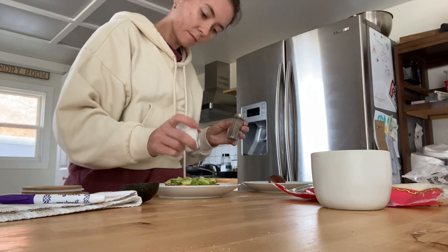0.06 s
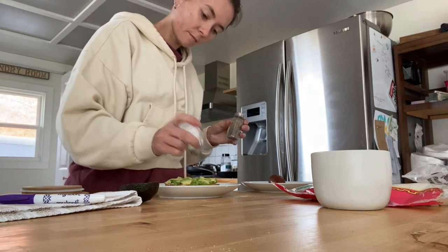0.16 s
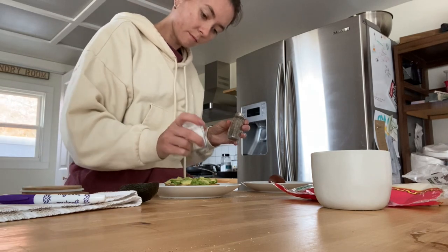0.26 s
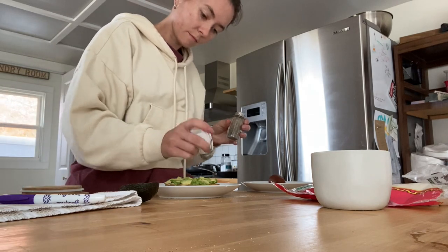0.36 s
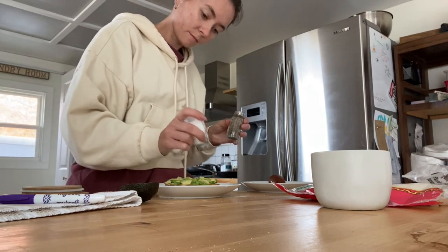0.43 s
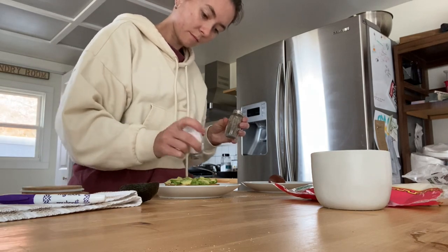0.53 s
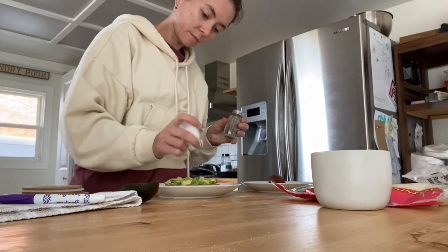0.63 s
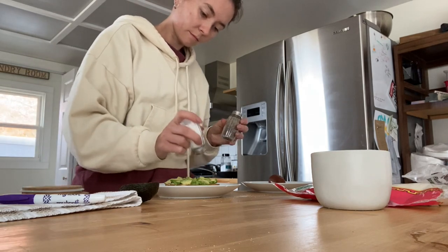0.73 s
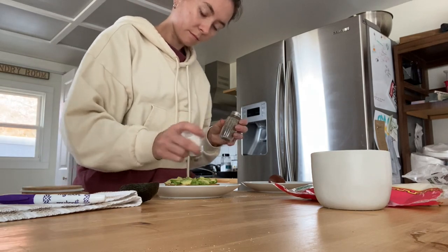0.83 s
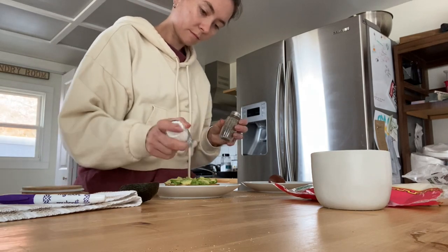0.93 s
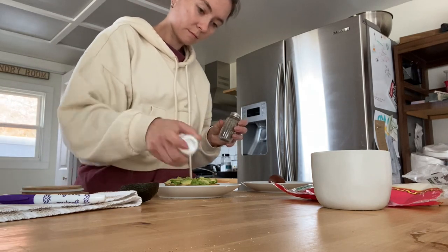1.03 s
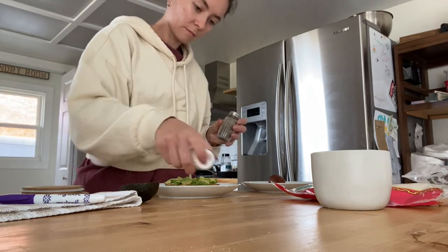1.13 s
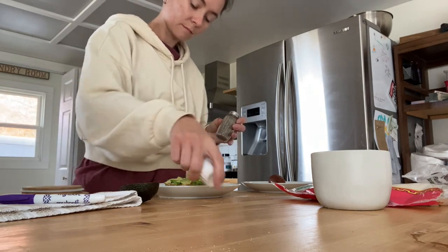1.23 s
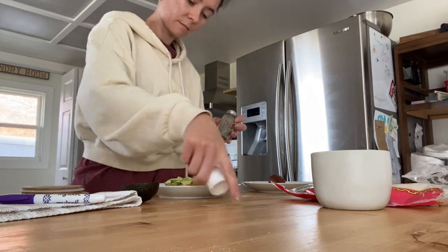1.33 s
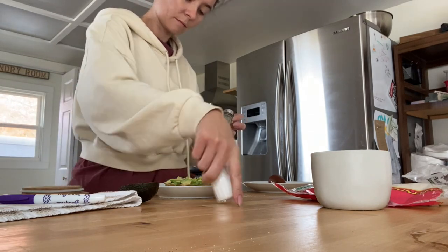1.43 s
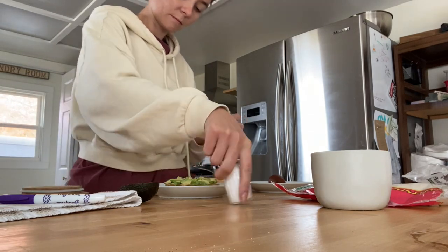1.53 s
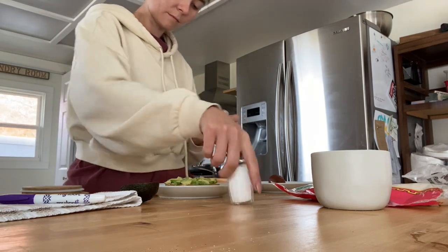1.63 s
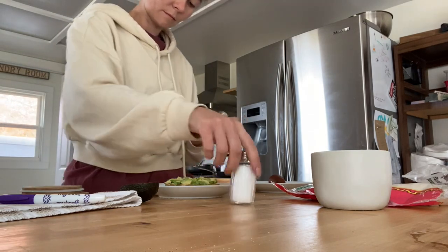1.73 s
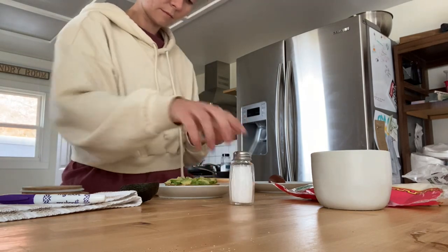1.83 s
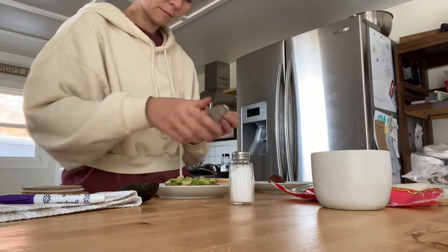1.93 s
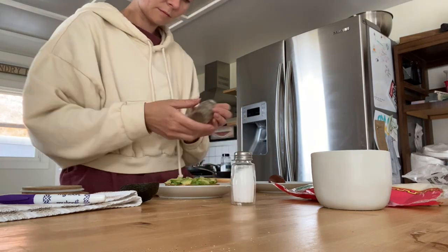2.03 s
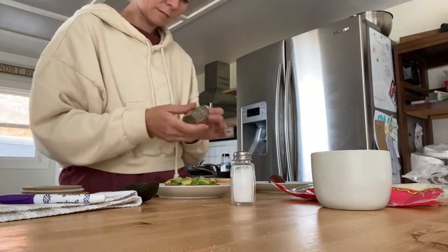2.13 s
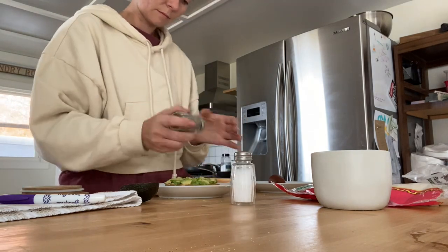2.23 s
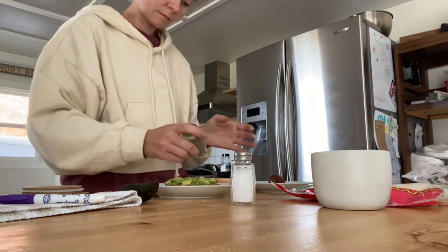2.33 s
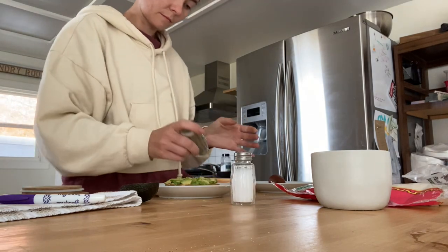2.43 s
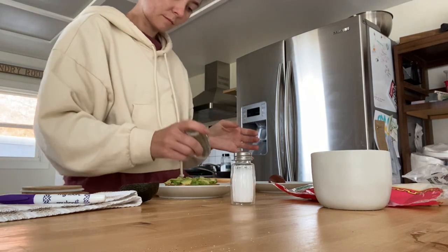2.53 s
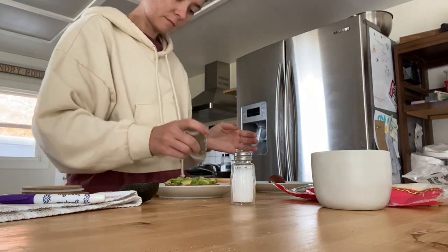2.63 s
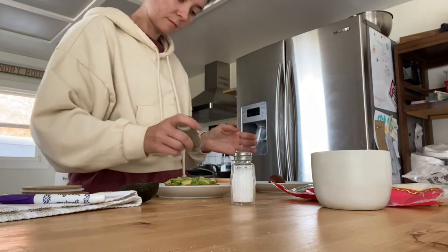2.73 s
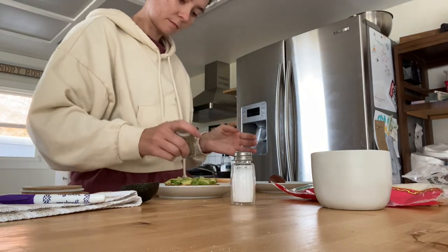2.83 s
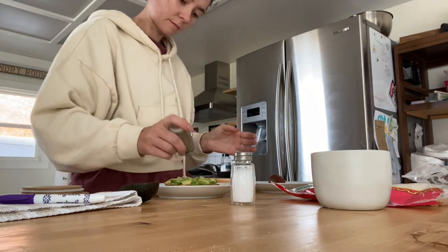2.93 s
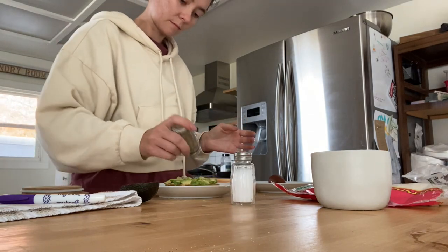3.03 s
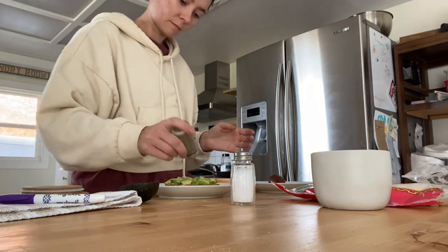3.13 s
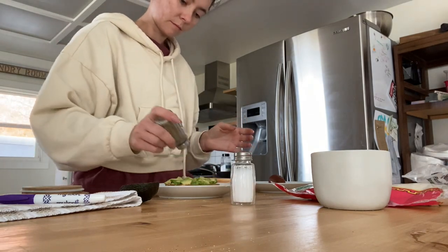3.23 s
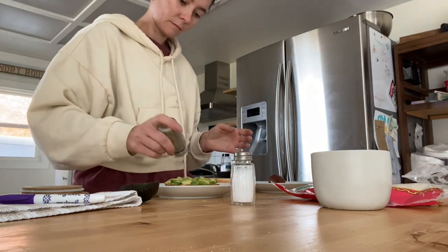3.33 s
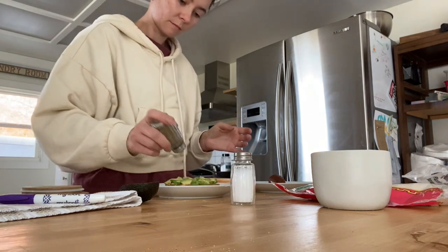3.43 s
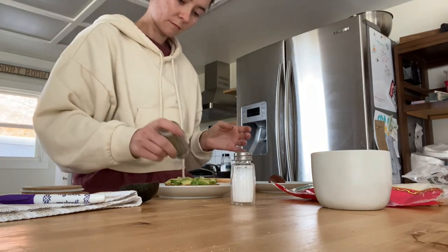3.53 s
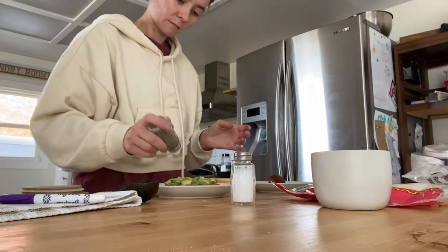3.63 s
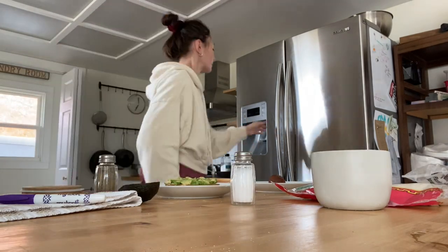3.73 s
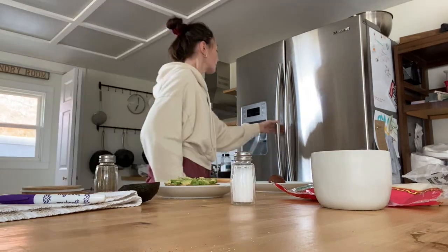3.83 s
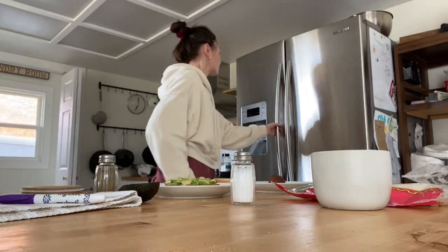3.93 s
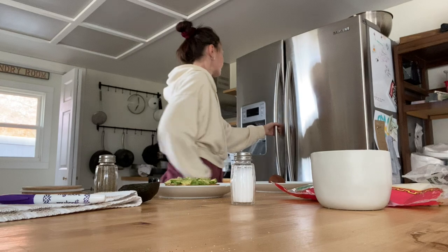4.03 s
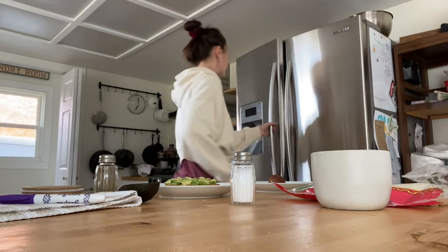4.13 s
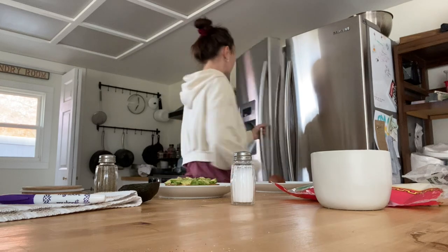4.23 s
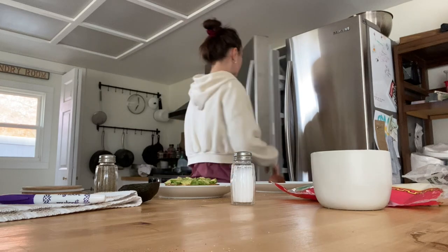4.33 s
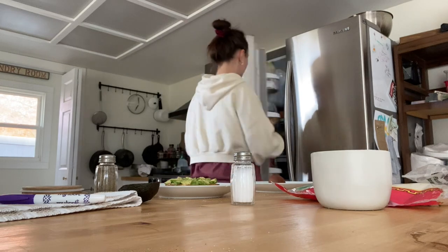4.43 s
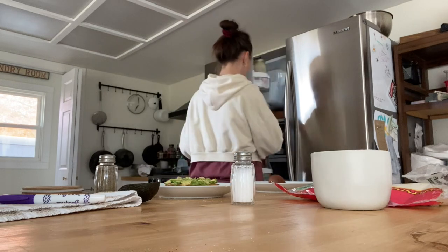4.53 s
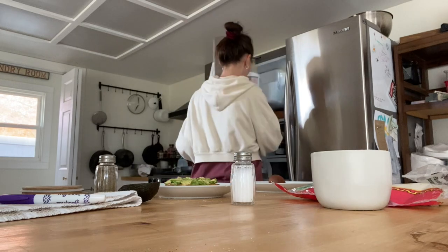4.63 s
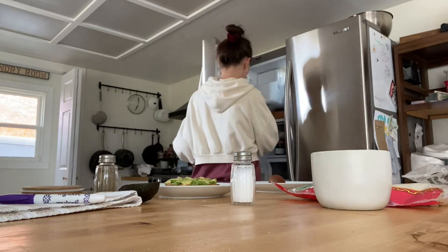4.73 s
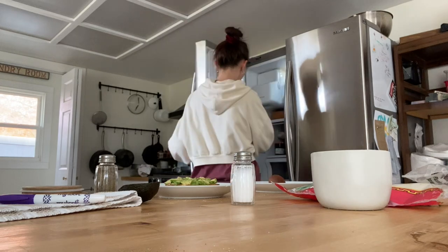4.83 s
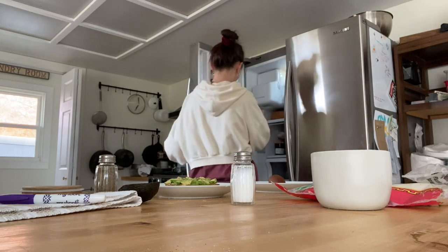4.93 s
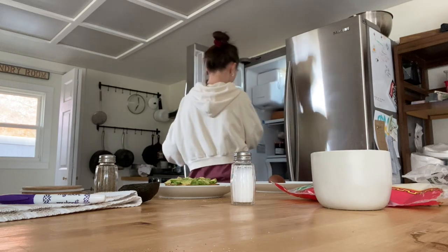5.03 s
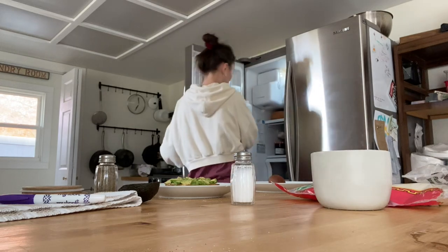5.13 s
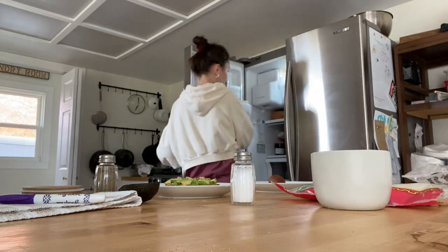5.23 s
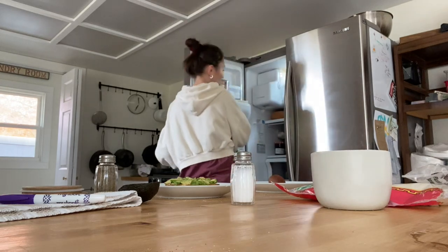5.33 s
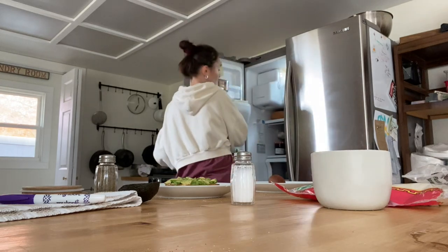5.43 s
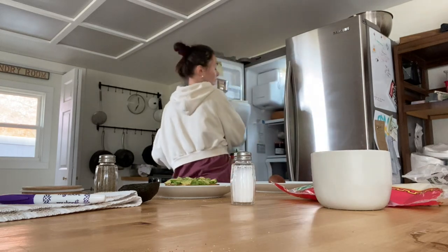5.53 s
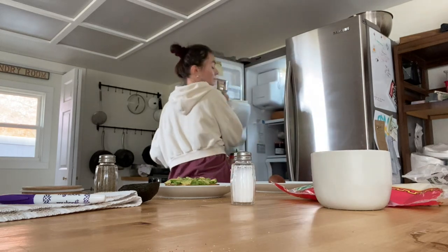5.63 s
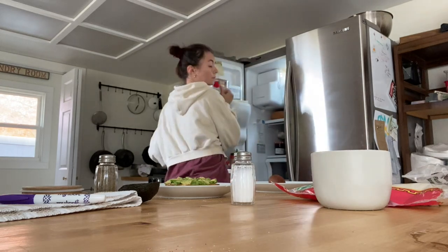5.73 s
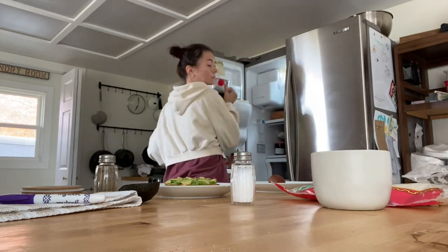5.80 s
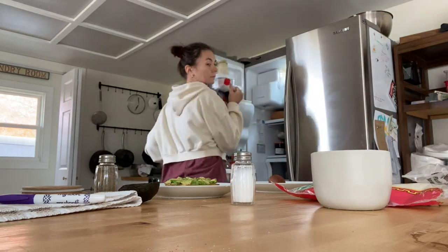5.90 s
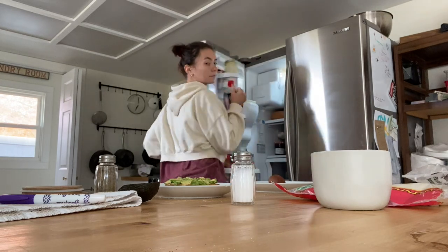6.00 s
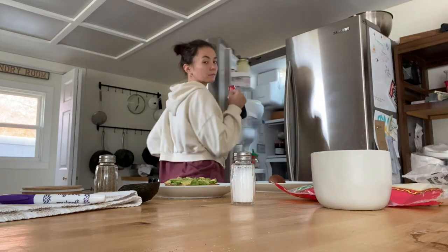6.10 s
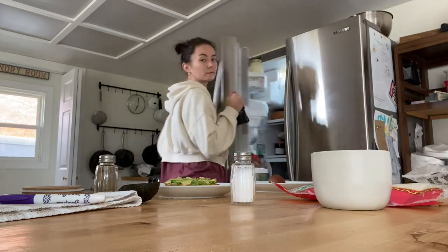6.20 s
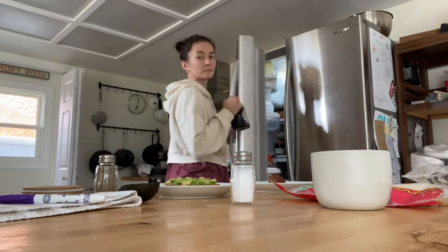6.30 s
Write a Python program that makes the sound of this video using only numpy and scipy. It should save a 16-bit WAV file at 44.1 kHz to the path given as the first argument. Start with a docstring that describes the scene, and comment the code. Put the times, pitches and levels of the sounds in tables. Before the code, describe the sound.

Low motor hum fills a small live kitchen. A soft gritty shake and tiny metal cap ticks lead to a glass foot landing on a wooden table, close by, then juddering across the grain with hollow knocks and rumble. Farther off and more reverberant, a fridge door comes loose with plastic clacks, dull thuds and a soft boom; contents knock and clink, strongest near the end, then quiet hum returns.

```python
"""A quiet kitchen: the fridge motor drones and low filtered noise hums throughout. A glass salt shaker hisses
with gritty noise and its cap ticks; it lands on a wooden table, then drags in short judders: noise bursts ring
board modes, under scrape and rumble. Across the room a fridge door is pulled open: bins and panels knock, jars
clink, air rushes and the door shudders and booms. A decaying noise tail answers each knock."""
import sys
import numpy as np
from scipy import signal
from scipy.fft import rfft, irfft, next_fast_len
from scipy.io import wavfile
from scipy.ndimage import map_coordinates

SR = 44100
rng = np.random.default_rng(int(sys.argv[2]) if len(sys.argv) > 2 else 0)


def to_wav(s):
    """Save 16-bit WAV."""
    ch = np.atleast_2d(s).T  # columns
    pcm = np.round(np.clip(ch, -1, 1) * 32767)  # PCM
    wavfile.write(sys.argv[1], SR, pcm.astype(np.int16))


N = 280476

# dragged foot catching on the grain:
# [t/s, click/dB, knock/dB, board thump/dB, knock f/Hz, thump f/Hz]
FOOT_CATCHES = [(1.632, -81.5, -41.5, -25.5, 500, 228.8), (1.641, -74, -35.5, -29, 700, 215.5),
                (1.652, -78.5, -51, -27, 550, 219.1), (1.7033, -67.5, -45, -25.5, 504, 237.8),
                (1.7298, -64.5, -35, -24, 712, 237.1), (1.7466, -52.5, -26, -22, 882, 231.6),
                (1.764, -72.5, -43.5, -31, 599, 197), (1.7825, -76, -53.5, -28, 460, 250.8),
                (1.8173, -45, -27.5, -25.5, 820, 292.5), (1.832, -65, -32, -24.5, 600, 229.3),
                (1.876, -59, -39, -24, 595, 229), (1.9022, -63, -37, -31.5, 510, 219.9),
                (1.94, -52, -32, -37, 787, 286), (1.949, -57, -37, -19.5, 580, 223.7),
                (1.979, -62, -48.5, -37, 552, 286), (2.0094, -53, -26, -22.5, 790, 258.7),
                (2.032, -68.5, -44.5, -29.5, 594, 240), (2.048, -68.5, -34.5, -22, 690, 266.8),
                (2.0641, -55.5, -33.5, -24.5, 1100, 250), (2.079, -68, -37.5, -23.5, 660, 214),
                (2.1019, -65.5, -43, -36.5, 1180, 250), (2.1111, -65.5, -32.5, -22.5, 664, 248.8),
                (2.126, -67.5, -38.5, -22, 605, 251.1), (2.138, -65, -44, -27.5, 504, 217.4),
                (2.1744, -63, -29.5, -25.5, 591, 248.6), (2.185, -66, -30.5, -21, 610, 259.9),
                (2.2117, -68, -40, -32, 1100, 253.4), (2.2195, -68.5, -43.5, -26.5, 500, 250),
                (2.244, -56.5, -37, -25.5, 1115, 219.5), (2.2665, -70.5, -32, -25, 640, 272.7),
                (2.276, -69, -32.5, -29, 1100, 274), (2.2892, -55, -33.5, -26, 1240, 299),
                (2.3024, -73, -28.5, -22.5, 633, 253)]
# fridge contacts: [t/s, crack/dB, knock/dB, panel thud/dB, knock f/Hz, thud f/Hz]
FRIDGE_CONTACTS = [(3.4966, -72.5, -53, -56.5, 976, 197.4), (3.519, -76.5, -51.5, -73, 665, 167),
                   (3.7664, -65.5, -74.5, -67.5, 710, 121.5), (3.7885, -46.5, -34.5, -41.5, 744, 488),
                   (3.8014, -46.5, -37, -33, 730, 311), (3.868, -53, -42, -36, 900, 294),
                   (3.8817, -43.5, -31.5, -29, 1280, 497), (3.8936, -47.5, -19, -27, 620, 226),
                   (3.92, -41.5, -34, -24, 690, 381), (3.9466, -50.5, -24.5, -21.5, 576, 326),
                   (3.956, -49.5, -27, -20, 773, 266.4), (3.978, -58.5, -45.5, -43.5, 930, 261),
                   (3.9975, -42.5, -48, -28.5, 640, 153.2), (4.016, -67, -39, -37.5, 1000, 221),
                   (4.036, -66, -38.5, -60, 796, 155), (4.048, -31.5, -23, -22, 784, 294.7),
                   (4.0565, -23, -19, -31, 1830, 530), (4.058, -41.5, -27, -43, 965, 403),
                   (4.068, -40.5, -31, -21.5, 724, 257.6), (4.0835, -50, -27, -20, 973, 250),
                   (4.1, -37, -26, -55, 1030, 250), (4.2467, -58, -37, -30.5, 703, 240.7),
                   (4.268, -78, -55, -33.5, 600, 162.3), (4.4945, -37, -37.5, -30, 615, 507.4),
                   (4.5434, -39.5, -46, -35.5, 700, 531), (4.7737, -54, -49, -58, 890, 202),
                   (4.9444, -55, -49.5, -44.5, 610, 466), (5.0094, -40.5, -40.5, -40, 920, 490),
                   (5.034, -33, -30, -33.5, 880, 482.4), (5.0405, -32.5, -23.5, -31, 907, 441.4),
                   (5.042, -46, -28, -45.5, 1174, 456), (5.0805, -46, -46, -31.5, 1020, 454),
                   (5.098, -25, -40, -29.5, 930, 307), (5.116, -51.5, -41.5, -36.5, 900, 320),
                   (5.138, -48, -54.5, -37.5, 910, 355), (5.1845, -41.5, -22, -28, 1060, 439.6),
                   (5.187, -60, -42, -23, 1700, 265.2), (5.1885, -52.5, -33.5, -20, 730, 429.8),
                   (5.2052, -42, -30.5, -21, 1940, 440), (5.214, -61.5, -39, -21, 735, 419),
                   (5.244, -70.5, -45.5, -30.5, 700, 250), (5.2727, -65.5, -54, -31, 700, 210),
                   (5.3651, -49.5, -39.5, -59, 1080, 423), (5.387, -28, -26, -30, 1066, 291),
                   (5.394, -41.5, -26, -33.5, 1070, 399), (5.409, -47.5, -31, -24, 618, 287.6),
                   (5.4287, -17.5, -17.5, -23.5, 914, 312), (5.4445, -35.5, -27, -20.5, 1110, 425),
                   (5.458, -41, -26.5, -17, 1040, 358), (5.477, -34, -18.5, -20.5, 1280, 316.2),
                   (5.4952, -33, -17, -18, 990, 296), (5.504, -40.5, -24.5, -15.5, 673, 360.4),
                   (5.519, -41.5, -33, -15.5, 700, 351.1), (5.535, -44, -31, -29, 905, 336),
                   (5.561, -40.5, -27, -32, 870, 302), (5.582, -49, -55, -27.5, 710, 345),
                   (5.6275, -27.5, -25, -39.5, 636, 232), (5.641, -64.5, -29.5, -24.5, 660, 299.8),
                   (5.659, -58, -33.5, -24, 620, 312), (5.691, -38.5, -28, -30.5, 1140, 351),
                   (5.68, -61, -44, -29, 700, 327.4), (5.717, -51, -44, -24, 605, 357),
                   (6.2997, -61.5, -65, -65, 594, 284)]


def amp(db):
    """Decibels to gain."""
    return 10 ** (np.asarray(db) / 20)


def unit(x):
    """Scale to rms 1."""
    return x / np.sqrt(np.mean(x ** 2) + 1e-20)


def noise(channels=None):
    """White Gaussian noise over the whole scene."""
    return rng.standard_normal(N if channels is None else (channels, N))


def along(points, hz):
    """Interpolate (f/Hz, value) points on a log frequency axis."""
    f, v = np.transpose(points)
    return np.interp(np.log(hz + 1), np.log(f + 1), v)


def level(rows):
    """Gain per sample from (t/s, level/dB) rows, -140 dB outside them."""
    t_s, db = np.transpose(rows)
    return amp(np.interp(np.arange(N) / SR, t_s, db, left=-140, right=-140))


def swells(rows, rise_db_per_s, fall_db_per_s):
    """Gain per sample: each (t/s, level/dB) peak climbs and sinks at a constant dB rate."""
    t = np.arange(N) / SR
    gain = 0
    for peak_s, db in rows:
        drop_db = np.where(t < peak_s, rise_db_per_s * (peak_s - t), fall_db_per_s * (t - peak_s))
        gain = gain + amp(db - drop_db)
    return gain


def wobble(knots_per_s):
    """Smooth random curve through Gaussian knots."""
    knots = rng.standard_normal(int(N * knots_per_s / SR) + 4)
    return map_coordinates(knots, [np.arange(N) * knots_per_s / SR])


def filtered(x, response):
    """Apply a complex frequency response by zero-padded FFT."""
    n = x.shape[-1]
    m = next_fast_len(n + SR // 4)
    return irfft(rfft(x, m) * response(np.fft.rfftfreq(m, 1 / SR)), m)[..., :n]


def shade(points):
    """Smooth zero-phase response through (f/Hz, gain/dB) points."""
    return lambda hz: amp(along(points, hz))


def modes(peaks):
    """Causal sum of (f/Hz, width/Hz, gain/dB) resonances with alternating sign."""
    def response(f):
        total = 0
        for k, (centre, width, db) in enumerate(peaks):
            band = 1j * f * width
            total = total + (-1) ** k * amp(db) * band / (centre ** 2 - f * f + band)
        return total
    return response


def near(centre_hz, width_ratio):
    """Broad resonance favouring modes about the pitch of the struck spot."""
    return lambda f: 1j * f * centre_hz / (centre_hz ** 2 - f * f + 1j * f * centre_hz * width_ratio)


def narrow(hz, width_hz):
    """One resonance applied twice."""
    return lambda f: modes([(hz, width_hz, 0)])(f) ** 2


def gritty(spectrum, grit_db):
    """Shaped noise at rms 1 with a fast random flicker, like dense small grains."""
    return unit(filtered(noise(2) * amp(grit_db * wobble(260)), shade(spectrum)))


def narrow_hum(rows, hz, width_hz):
    """Noise with a given level course through a narrow resonance, gain-compensated for its width."""
    return filtered(level(rows) * noise(), narrow(hz, width_hz)) * np.sqrt(2 * SR / np.pi / width_hz)


def hum():
    """Room at rest: drifting low noise, wavering fridge-motor tones and microphone self-noise."""
    # centre spectrum: [f/Hz, density/dB]
    centre_shape = [(12, -54.5), (20, -26.5), (31, -8), (42, -1.5), (60, -3), (84, -7), (107, -19.5),
                    (199, -17), (295, -15.5), (370, -27.5), (500, -24), (582, -29.5), (848, -34),
                    (1800, -54.5), (2340, -85.5), (3960, -120)]
    # side spectrum: [f/Hz, density/dB]
    side_shape = [(20, -12), (40, 1), (65, 11.5), (110, -14), (210, 3), (300, -5), (500, -9.5), (600, -15),
                  (870, -22.5), (1800, -35.5), (4000, -41), (8000, -45.5), (15000, -40.5)]
    # fridge-motor tones: [f/Hz, resonance width per pass/Hz, level/dB]
    motor_tones = [(48.21, 6, -62.5), (210, 9.1, -65.5), (250, 9.8, -69), (296, 10, -72), (497, 7.6, -77)]
    # microphone self-noise: [f/Hz, density/dB]
    fizz_shape = [(800, -13), (1800, -2), (3800, -2), (4300, -9), (8000, -8), (13500, -7.5)]
    centre = unit(filtered(noise(), shade(centre_shape)))
    sides = amp(-2.5) * unit(filtered(noise(), shade(side_shape)))
    drift = amp(-53.5 + 1.9 * wobble(5.5))
    drone = sum(amp(db) * unit(filtered(noise(), narrow(hz, width_hz))) for hz, width_hz, db in motor_tones)
    fizz = amp(-81.5) * unit(filtered(noise(), shade(fizz_shape)))
    return drift * np.array([centre, sides]) + [fizz + drone, 0.33 * drone]


def salt():
    """Salt rushing in the glass: gritty noise swelling at each shake."""
    # shakes: [t/s, level/dB]
    shakes = [(0.96, -64.5), (1.15, -62.5)]
    # grain spectrum: [f/Hz, density/dB]
    grain = [(600, 1), (1500, -4.5), (3000, -5.5), (6000, -17.5), (12000, -31.5)]
    return swells(shakes, rise_db_per_s=342.5, fall_db_per_s=126.5) * gritty(grain, grit_db=2.0)


def cap():
    """Metal cap ticks: 3 ms t60 noise bursts, each about its own pitch."""
    # ticks: [t/s, peak level/dB, f/Hz]
    ticks = [(0.9921, -62, 2400), (1.165, -50, 2300), (1.285, -63.5, 2890), (1.884, -56, 3800),
             (1.8924, -49, 6500), (1.9675, -57.5, 5500), (2.039, -57, 7300), (2.134, -58, 6000),
             (2.4832, -63, 2400), (2.6613, -62, 5630)]
    out, t = np.zeros((2, N)), np.arange(400) / SR
    for onset_s, db, hz in ticks:
        burst = amp(-60 * t / 0.003) * rng.standard_normal((2, len(t)))
        tick = filtered(burst, lambda f: near(hz, .6)(f) ** 2)
        out[:, round(onset_s * SR):][:, :len(t)] += amp(db) * tick / np.abs(tick).max()
    return out


def room(dry):
    """Convolve each contact with its own centre and side tails: noise dying by frequency."""
    # reverberation time: [f/Hz, t60/s]
    decay = [(100, 0.36), (500, 0.424), (2000, 0.507), (6000, 0.3815), (12000, 0.16)]
    # relative tail spectrum: [f/Hz, gain/dB]
    wet = [(100, -3.5), (300, -0.5), (600, 4), (1000, 3), (2500, 5), (4000, 8), (12000, 14.5)]
    build_s = 0.0012
    hz, t, z = signal.stft(rng.standard_normal((len(dry), 2, SR * 3 // 5)), SR, nperseg=256)
    tail_db = along(wet, hz)[:, None] - 60 * t / along(decay, hz)[:, None]
    tail = amp(-33.5) * signal.istft(z * amp(tail_db), SR, nperseg=256)[1]
    tail = tail * (1 - np.exp(-(np.arange(tail.shape[-1]) / SR / build_s) ** 2))
    return signal.fftconvolve(dry[:, None], tail, axes=2)


def contacts(table, high, middle, low, side_db, base_t60_s, swell_s, room_db, crack_rise_s,
             knock_solid, thump_solid):
    """Bursts of rough force ring a body's high, middle and low parts; lower parts are pushed longer."""
    onset_s, crack_db, knock_db, thump_db, knock_hz, thump_hz = np.array(table).T[:, :, None]
    count, lead = len(table), SR // 25
    t = np.arange(SR // 5) / SR - lead / SR
    after = np.maximum(t, 0)
    knock_spot, thump_spot = near(knock_hz, 0.49), near(thump_hz, 0.707)
    middle_body = lambda f: middle(f) * knock_spot(f)
    low_body = lambda f: low(f) * thump_spot(f) / (1 + 1j * f / 900)
    # body, level/dB, push lead/s, push rise/s, t60 factor, own f/Hz, cycles to -60 dB, own share 0-1
    parts = [(high, crack_db, 0, crack_rise_s, .4, None, None, 0),
             (middle_body, knock_db, 0.39 * swell_s, 0.22 * swell_s, .7, knock_hz, 12.7, knock_solid),
             (low_body, thump_db, swell_s, swell_s, 1.2, thump_hz, 10.42, thump_solid)]
    dry = spread = 0
    for k, (body, db, early_s, rise_s, stretch, own_hz, ring_cycles, solid) in enumerate(parts):
        swell = 1 - np.exp(-(np.maximum(t + early_s, 0) / rise_s) ** 2)
        push = rng.standard_normal((count, len(t))) * swell * amp(-60 * after / (base_t60_s * stretch))
        rings = filtered(push, body)
        rings = rings / np.abs(rings).max(axis=1, keepdims=True)
        if own_hz is not None:  # damped sine of the struck spot
            cycles = after * own_hz
            own = np.sin(2 * np.pi * cycles) * (1 - np.exp(-(cycles / 0.84) ** 2))
            own = own * amp(-60 * (cycles / ring_cycles) ** 2)
            rings = (1 - solid) * rings + solid * own / np.abs(own).max(axis=1, keepdims=True)
        rings = amp(db) * rings
        dry = dry + rings
        # room feed: same energy with the body's even colour, lower parts later
        blow = np.tile(np.arange(len(t)) == lead + k * (SR // 300), (count, 1)) * 1.
        even = filtered(blow, body)
        energy_gain = np.linalg.norm(rings, axis=1, keepdims=True) / np.linalg.norm(even, axis=1, keepdims=True)
        spread = spread + even * energy_gain
    # a firm knock stands further out of the room
    wet_db = room_db - 0.2227 * (knock_db - knock_db.mean())
    heard = room(spread * amp(wet_db))
    heard[..., :len(t)] += dry[:, None] * np.array([[1], [amp(side_db)]])
    out = np.zeros((2, N + heard.shape[-1]))
    for start_s, one in zip(onset_s[:, 0], heard):
        out[:, round(start_s * SR) - lead:][:, :one.shape[-1]] += one
    return out[:, :N]


def shaker():
    """Glass foot lands and rocks to rest, then sticks and slips, ringing the table board at each catch."""
    # landing: [t/s, click/dB, knock/dB, board thump/dB, knock f/Hz, thump f/Hz]
    landing = [(1.3735, -47.5, -45, -41, 1220, 251.1), (1.4018, -32, -16, -21, 914, 490.3),
               (1.404, -71, -32.5, -26, 562.4, 142.9), (1.4065, -57.5, -33, -16.5, 505, 235),
               (1.4155, -64.5, -30, -22, 1102, 210), (1.4384, -63, -25.5, -29.5, 924, 201.2),
               (1.4737, -65, -29.5, -38, 703, 245.5), (1.443, -72.5, -32.5, -32.5, 602.5, 145),
               (1.452, -61, -25.5, -30, 771, 250), (1.5214, -68.5, -43, -29, 618, 228),
               (1.565, -76.5, -49, -40, 497, 245)]
    # glass click spectrum: [f/Hz, density/dB]
    foot = [(1000, -7), (1600, 2), (2200, 4), (3200, -5), (4200, -22.5), (5000, -25), (6000, -20),
            (7000, -33.5), (12000, -47.5)]
    # table top under the foot: [f/Hz, width/Hz, gain/dB]
    base = [(566.6, 58, 0), (836.6, 120, -4), (1352, 190, -11)]
    # low table-top modes: [f/Hz, width/Hz, gain/dB]
    board = [(122.43, 19, 0.5), (229, 29, -7), (302.6, 12, -7), (440, 44, -6)]
    body = dict(high=shade(foot), middle=modes(base), low=modes(board), side_db=-2.5)
    landed = contacts(landing, **body, base_t60_s=0.045, swell_s=0.002, room_db=-8,
                      crack_rise_s=0.0012, knock_solid=0.6, thump_solid=0.85)
    caught = contacts(FOOT_CATCHES, **body, base_t60_s=0.06, swell_s=0.0012, room_db=-7,
                      crack_rise_s=0.001, knock_solid=0.45, thump_solid=0.75)
    return landed + caught


def board_rumble():
    """Table top hums under the sliding foot: noise through a resonance near 226 Hz."""
    # hum: [t/s, level/dB]
    rows = [(1.58, -49.5), (1.728, -43.5), (1.848, -40), (1.914, -36.5), (2.136, -38.5), (2.196, -38.5),
            (2.328, -48.5), (2.4, -63.5)]
    return narrow_hum(rows, hz=225.7, width_hz=62)


def drag():
    """Rough wood under glass: gritty noise in the board's upper modes, flaring at each catch."""
    # foot pressure between catches: [t/s, scrape level/dB]
    pressure = [(1.6, -66.5), (2.0, -83.5), (2.28, -59.5), (2.4, -72)]
    # scrape spectrum: [f/Hz, density/dB]
    scrape = [(400, 5), (700, 9.5), (1180, 3.5), (1600, -11.5), (2200, -17), (3200, -29.5), (3800, -58.5),
              (8000, -49)]
    slip_db = -19  # against the knock
    peaks = [(t_s, knock_db + slip_db) for t_s, click_db, knock_db, *rest in FOOT_CATCHES]
    flares = swells(peaks, rise_db_per_s=709.5, fall_db_per_s=795)
    return (level(pressure) + flares) * gritty(scrape, grit_db=5.0)


def brush():
    """Fingers brush the cap: soft gritty noise in short swells."""
    # strokes: [t/s, level/dB]
    strokes = [(1.638, -75.5), (1.9, -72.5), (1.97, -79.5), (2.04, -85), (2.135, -83.5), (3.522, -82)]
    # skin spectrum: [f/Hz, density/dB]
    skin = [(1000, -20), (3000, -2.5), (5000, -2.5), (7500, 1), (12000, -11.5)]
    return swells(strokes, rise_db_per_s=499.0, fall_db_per_s=162) * gritty(skin, grit_db=1.5)


def fridge():
    """Seal, bins and jars knock far off: force bursts ring bin and panel modes, deep in the room."""
    # crack spectrum: [f/Hz, density/dB]
    crack = [(1000, 4.5), (1700, -1), (2500, -3), (4000, -8), (8000, -14.5), (12000, -19), (15000, -28)]
    # plastic bins: [f/Hz, width/Hz, gain/dB]
    bins = [(617.3, 110, 10), (973.5, 280, 6), (1355, 870, 0)]
    # door and liner: [f/Hz, width/Hz, gain/dB]
    panel = [(126, 204, -6.5), (219.9, 53, 4.5), (312, 43, -1), (414.6, 45, -1.5), (528, 130, -5)]
    return contacts(FRIDGE_CONTACTS, shade(crack), modes(bins), modes(panel), side_db=-4,
                    base_t60_s=0.058, swell_s=0.004, room_db=0,
                    crack_rise_s=0.0012, knock_solid=0.55, thump_solid=0.72)


def jars():
    """Jars chatter after each crack: sparse random impulses of uneven size ring glass modes."""
    # glass modes: [f/Hz, width/Hz, gain/dB]
    glass = [(731.7, 16, 5), (1072.4, 26.65, 0.5), (1211.3, 22, -5.5), (1468.8, 29, -6.5), (1627.3, 16, -7),
             (1940, 35, -9.5), (2082.3, 26, -7.5), (2244.7, 28, -9), (2473.5, 18, -10), (2647, 32, -11),
             (3025.4, 35, -13)]
    clink_db, clinks_per_s = -18.5, 220  # level against the crack, density
    peaks = [(t_s + .006, crack_db + clink_db) for t_s, crack_db, *rest in FRIDGE_CONTACTS]
    shake = swells(peaks, rise_db_per_s=3001.5, fall_db_per_s=208)
    clinks = (rng.random((2, N)) < clinks_per_s / SR) * amp(5.65 * noise(2))
    steady_rms = np.sqrt(np.mean(filtered(clinks, modes(glass)) ** 2))
    return filtered(shake * clinks, modes(glass)) / steady_rms


def rush():
    """Soft uneven rush while the door is open: shaped noise with a slight level wobble."""
    # rush: [t/s, level/dB]
    open_door = [(3.7, -106), (3.84, -61), (3.97, -50), (4.04, -57.5), (4.09, -49), (4.25, -64), (4.8, -73),
                 (5.2, -60.5), (5.44, -67.5), (5.56, -61.5), (5.8, -68.5), (6.36, -82)]
    spectrum = [(500, 5.0), (1500, 4.0), (4000, -5.0), (8000, -9.5), (13000, -25.5)]  # f/Hz, density/dB
    air = unit(filtered(noise(2), shade(spectrum)))
    return level(open_door) * amp(0.45 * wobble(18)) * air


def door_shudder():
    """Door shudders as the seal lets go: noise through a resonance at 140 Hz."""
    # shudder: [t/s, level before a 6 dB cut/dB]
    rows = [(3.8, -68.5), (3.822, -59.5), (4.006, -31), (4.028, -38), (4.134, -41), (4.148, -53.5),
            (4.234, -52.5), (4.27, -46.5), (4.45, -58)]
    return amp(-6) * narrow_hum(rows, hz=140, width_hz=77)


def swing():
    """Moving door pumps air: noise through a resonance near 57 Hz."""
    # boom: [t/s, level/dB]
    pumped = [(3.83, -74), (3.86, -53), (3.95, -38.5), (4.42, -58), (4.61, -42.5), (4.72, -61), (5.0, -68),
              (5.14, -44.5), (5.36, -59), (5.43, -43.5), (5.6, -52), (5.82, -62), (6.02, -54), (6.1, -49.5)]
    air = lambda f: modes([(57.4, 13.6, 0)])(f) / (1 + (f / 600) ** 2)
    return level(pumped) * unit(filtered(noise(), air))


def scene():
    """Sum the sources as centre and sides, then convert to left and right."""
    # sides against centre: [f/Hz, gain/dB]
    wide = [(60, -10.5), (250, -5), (600, 5), (1500, 0), (5000, 0.5), (8000, 2), (10300, 0.5), (11200, -18),
            (13000, -12.5), (13600, -6), (15000, -25.5)]
    # centre gain, dipping near 9 kHz: [f/Hz, gain/dB]
    centre_gain = [(8200, 0.5), (8800, -16), (9700, -17.5), (10300, -3.5), (13400, -5), (13900, -63.5)]
    centre, sides = (hum() + salt() + cap() + shaker() + drag() + brush()
                     + fridge() + jars() + rush())
    boom = board_rumble() + door_shudder() + swing()
    centre = filtered(centre, shade(centre_gain)) + boom
    # sides turned a quarter cycle at every frequency, so the direct sound leans to neither channel
    sides = filtered(sides, lambda hz: 1j * shade(wide)(hz)) + 0.12 * boom
    return np.array([centre + sides, centre - sides])


def record(dry):
    """Two microphone ports: frequency-dependent balance, deep bass cut and a sharp upper band limit."""
    # left over right: [f/Hz, difference/dB]
    lean = [(60, 0), (110, 5.5), (200, -1.5), (360, -3), (660, -3), (1200, -3), (2190, -1.5), (3980, -2.5),
            (7250, -0.5), (13200, 0.5)]
    low_hz, top_hz = 42.1, 15600

    def response(hz):
        balance = amp(along(lean, hz) * np.array([[.5], [-.5]]))
        return balance * (hz < top_hz) / np.sqrt(1 + (low_hz / (hz + 1)) ** 14)
    return filtered(dry, response)


dry = scene()
out = record(dry)
to_wav(out)
```